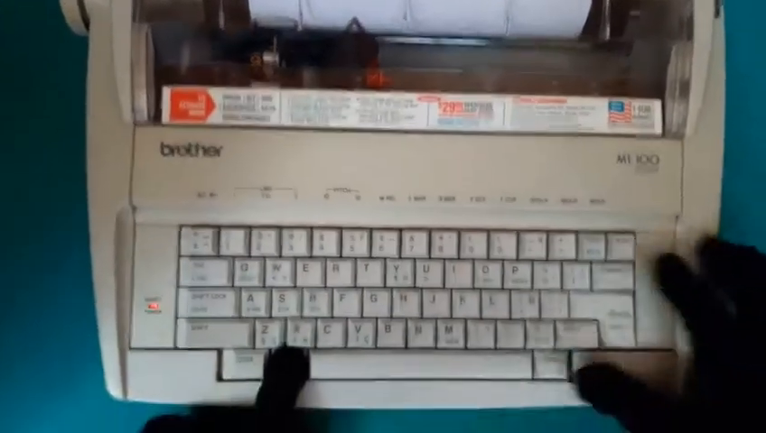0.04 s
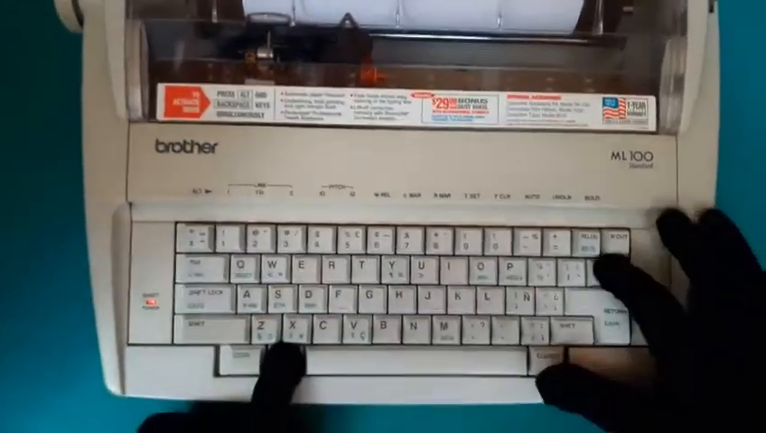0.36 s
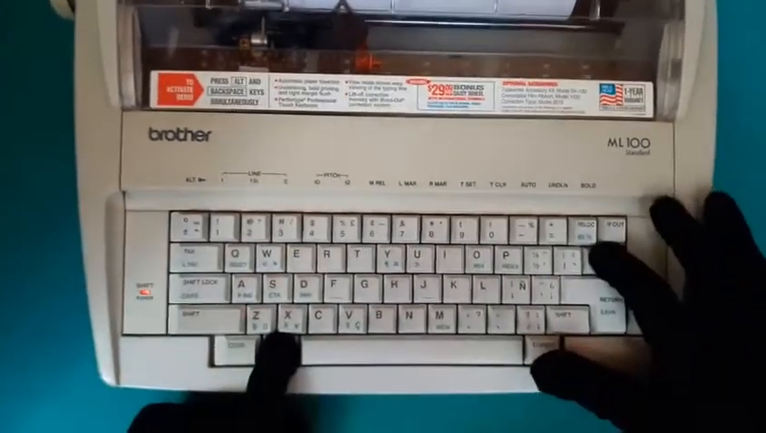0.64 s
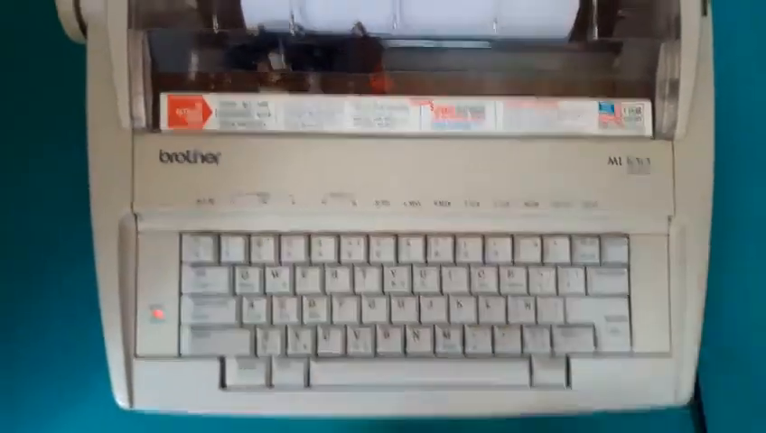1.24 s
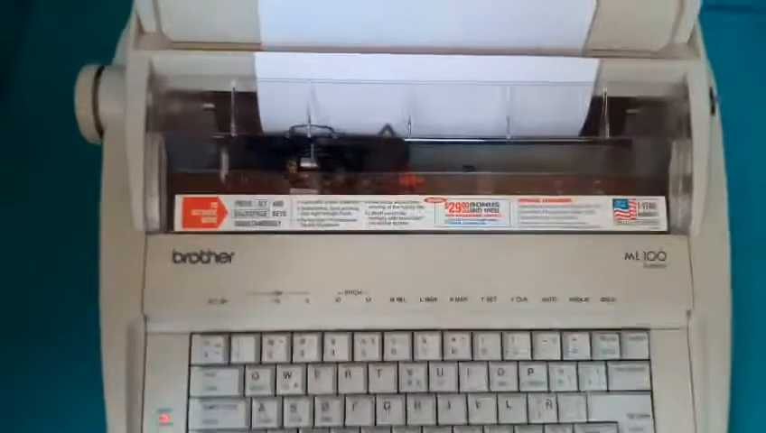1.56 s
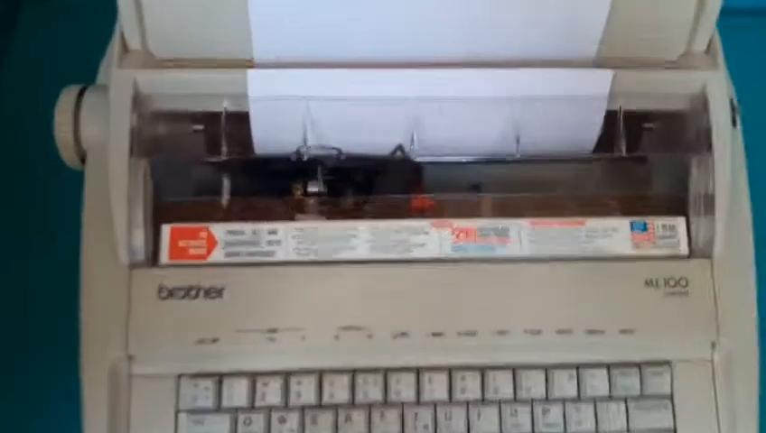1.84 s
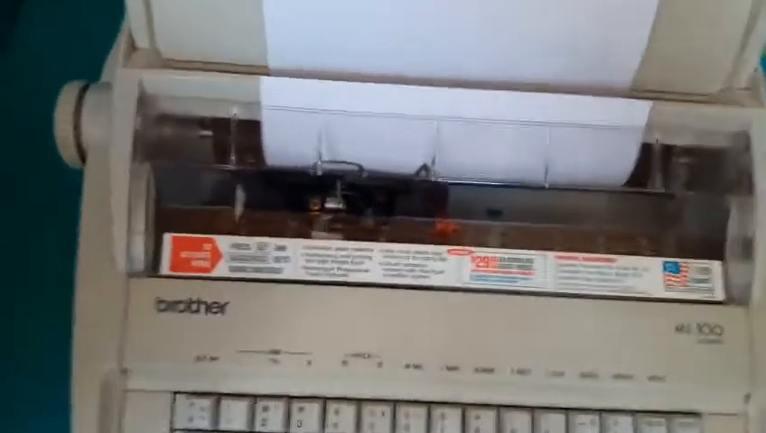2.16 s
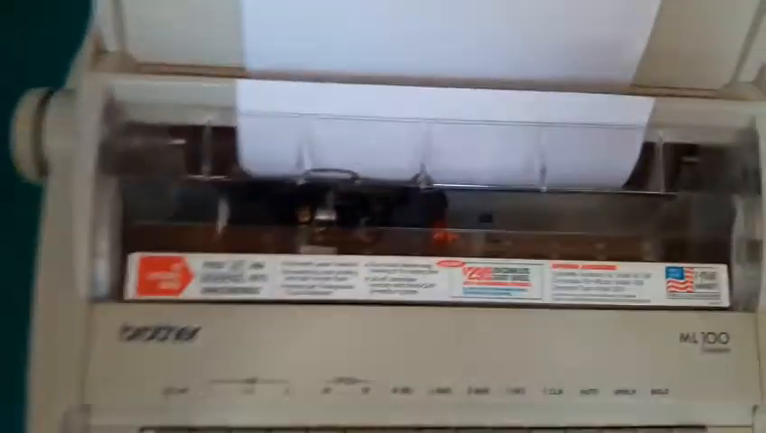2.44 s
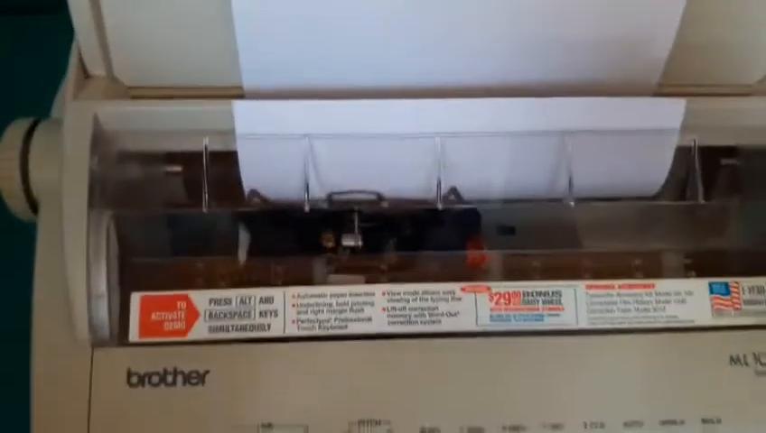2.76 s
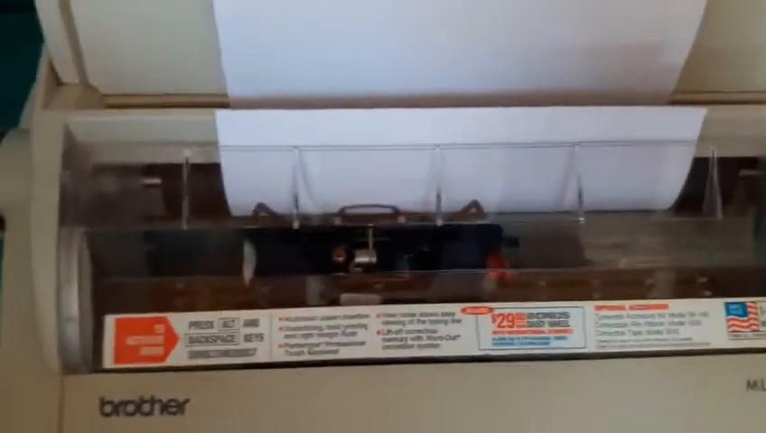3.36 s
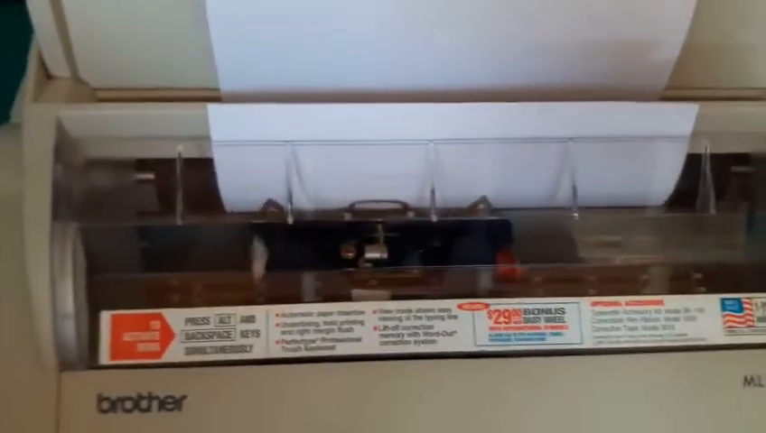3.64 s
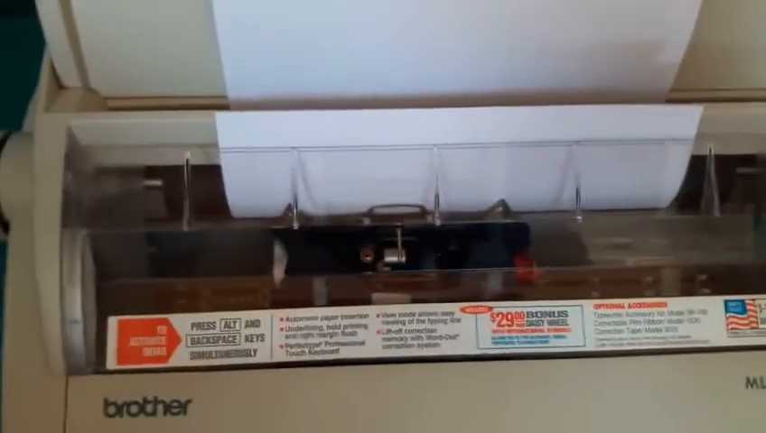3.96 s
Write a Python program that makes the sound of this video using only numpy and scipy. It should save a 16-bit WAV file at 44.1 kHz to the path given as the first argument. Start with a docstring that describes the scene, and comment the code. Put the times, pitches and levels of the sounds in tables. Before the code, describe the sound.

An electric typewriter prints in a small room. A key clicks faintly at about 0.4 seconds, then the motor spins up into a soft, wavering whine. From 0.8 seconds to the end at 4, about two dozen sharp clacks come in quick, uneven runs, each with a light rattle and a soft carriage knock. They turn slightly crisper around 2 seconds as the microphone nears. A low hum lies underneath.

```python
"""In a small room, an electric daisy-wheel typewriter prints a line. A key clicks, then the motor
spins up and whines. For each letter the ribbon mechanism snaps in and rattles, the hammer strikes
and bounces back in the plastic case, and the carriage steps on. The microphone moves from above
the keyboard towards the carriage. A low hum and quiet room noise lie underneath."""
import sys
import numpy as np
from scipy import signal
from scipy.fft import rfft, irfft
from scipy.io import wavfile
from scipy.ndimage import uniform_filter1d

SR = 44100
rng = np.random.default_rng(int(sys.argv[2]) if len(sys.argv) > 2 else 0)


def master(y):
    """Save y as 16-bit WAV."""
    cut = np.clip(np.atleast_2d(y).T, -1, 1)
    pcm = np.round(cut * 32767)  # scale
    wavfile.write(sys.argv[1], SR, pcm.astype(np.int16))


N = 176400
T = np.arange(N) / SR  # seconds since the scene began
AGE = T[:SR // 2]  # seconds since a knock began
FREQS_HZ = np.fft.rfftfreq(len(AGE), 1 / SR)  # the frequencies in one knock

# The printed letters: start_s, level_db, ribbon_offset_db
LETTERS = [(0.796, -4, -10), (1.005, -2.5, -9.5), (1.11, -3, -8), (1.207, -2, -10), (1.333, -2, -10.5),
           (1.492, -3, -7), (1.601, -2.5, -8.5), (1.699, -2, -8), (1.795, -2, -9), (2.018, -4, -6),
           (2.262, -1.5, -10), (2.362, -3, -8.5), (2.475, -1.5, -8), (2.573, -1.5, -9.5), (2.669, -1, -9.5),
           (2.805, -2, -9), (2.911, -1.5, -8.5), (3.168, -3, -9), (3.398, -2.5, -9), (3.497, -1.5, -9.5),
           (3.594, -3, -8.5), (3.75, -2, -8), (3.935, -1.5, -9.5)]


def hammer():
    """The hammer strikes, sets the case ringing and bounces back against a stop: a double thud."""
    # Tone colour of the strike and of the bounce: frequency_hz, gain_db
    strike_colour = [(30,-36),(220,-20.5),(400,-7.5),(900,-1.5),(1600,0),(4000,-3),(5200,-1),(7500,-12.5),(9800,-7),(12500,-17.5),(16000,-30)]
    bounce_colour = [(30,-13),(150,-18.5),(370,1.5),(800,-1),(1500,6.5),(3000,-9.5),(7500,-10.5),(9800,-8),(14000,-25)]
    # Ringing tones of the case and of the stop: pitch_hz, at_keyboard_db, at_carriage_db, fade_s
    case_tones = [(159.3,-42.5,-42,0.29),(258.8,-30.5,-29.5,0.12),(332.2,-42,-32.5,0.19),(478.2,-17.5,-23,0.087),(489,-18,-13,0.014),(606.6,-30,-34,.07),(1939,-23,-12.5,0.041),(2348,-25,-14.5,0.027),(3548,-16,-16.5,0.038)]
    stop_tones = [(625,-11.5,-14,.012),(704,-32,-25.5,0.089),(1501,-21,-18,0.074)]
    case_delay_s, bounce_delay_s = 0.002, 0.0094
    strike_noises, stop_noises = (noise(), noise()), (noise(), noise())
    out = np.zeros(N)
    for start_s, level_db, _ in LETTERS:
        near = nearness(start_s)
        strike = knock(part_noise(strike_noises, near), strike_colour, rise_s=0.0005, fade_s=0.061)
        add(out, start_s, undb(level_db - 7) * closer(strike, near))
        add(out, start_s + case_delay_s, undb(level_db) * ringing_part(case_tones, near))
        bounce = knock(part_noise(stop_noises, near), bounce_colour, rise_s=0.0005, fade_s=0.063)
        stop_ring = ringing_part(stop_tones, near)
        add(out, start_s + bounce_delay_s, undb(level_db) * (undb(-14) * bounce + stop_ring))
    return out


def ribbon():
    """The ribbon mechanism snaps in just before each strike, and its loose parts rattle."""
    # Tone colour of the ribbon mechanism: frequency_hz, gain_db
    ribbon_colour = [(60,-19.5),(150,-36),(300,-8),(1700,0.5),(2400,-4.5),(4000,-7),(5200,-1.5),(7600,-9.5),(10000,-7),(12500,-15),(16000,-24)]
    lead_s = 0.034
    snap_noises = (noise(), noise())
    out = np.zeros(N)
    for strike_s, level_db, ribbon_offset_db in LETTERS:
        snap_s = strike_s - lead_s
        gain = undb(level_db + ribbon_offset_db - 6)
        snap_noise = part_noise(snap_noises, nearness(strike_s))
        add(out, snap_s, gain * knock(snap_noise, ribbon_colour, rise_s=0.0024, fade_s=0.096))
        rattle_s = snap_s + rng.normal(0.018, 0.0032)
        rattle = knock(crackle(), ribbon_colour, rise_s=0.0005, fade_s=0.08)
        add(out, rattle_s, gain * undb(-7.5) * rattle)
    return out


def carriage():
    """The carriage jerks on by one letter with a soft, dull knock."""
    # The carriage's steps: start_s, level_db
    steps = [(0.858,-22.5),(1.059,-27.5),(1.163,-29),(1.274,-30),(1.388,-25),(1.551,-25),(1.656,-26),(1.756,-24),(1.855,-24.5),(2.074,-24),(2.322,-25),(2.422,-24.5),(2.531,-27.5),(2.634,-28.5),(2.727,-25.5),(2.865,-25.5),(2.996,-25),(3.224,-23),(3.454,-23.5),(3.548,-27),(3.651,-25),(3.837,-24.5),(3.99,-26.5)]
    # Tone colour of a step: frequency_hz, gain_db
    step_colour = [(60,-27),(160,1),(1200,1.5),(2000,-6),(2700,4),(3700,-16.5),(5500,-11.5),(15000,-35)]
    out = np.zeros(N)
    for start_s, level_db in steps:
        step = knock(noise(), step_colour, rise_s=0.002, fade_s=0.07)
        add(out, start_s, undb(level_db + 3) * closer(step, nearness(start_s)))
    return out


def keys():
    """A plastic key knocks down, clicks and fades in a soft rustle."""
    # Clicks of a key being pressed or let go: start_s, level_db, brightness_hz
    clicks = [(.358,-37,700),(.391,-34,3500),(0.913,-22.5,2550)]
    # Tone colour of the key: frequency_hz, gain_db
    key_colour = [(150,-18),(600,3.5),(2000,-5),(10000,-18),(15000,-34)]
    out = np.zeros(N)
    add(out, 0.366, ring(pitch_hz=303, level_db=-31.5, fade_s=0.02))  # soft knock of the key bed
    for start_s, level_db, brightness_hz in clicks:
        dulled = [(hz, db - 10 * np.log10(1 + (hz / brightness_hz) ** 2)) for hz, db in key_colour]
        rise_s = 2 / brightness_hz
        click = knock(noise(), dulled, rise_s, fade_s=0.045)
        rustle = knock(noise(), dulled, rise_s, fade_s=0.48)
        add(out, start_s, undb(level_db) * (click + undb(-12) * rustle))
    return out


def motor():
    """The motor spins up and slows a little at each letter; its gears churn and sing wavering tones."""
    # The motor spinning up: time_s, share_of_full_speed
    spin_up = [(.55,.85),(.66,.98),(.8,1)]
    # Tones of the whine: full_speed_pitch_hz, at_keyboard_db, at_carriage_db
    tones = [(479,-57,-47),(912,-47,-47),(985,-45,-49),(1045,-52,-46),(1565,-51,-52),(5330,-63,-65)]
    # Tone colour of the churning gears: frequency_hz, gain_db
    gear_colour = [(80,-15),(170,4.5),(700,0),(950,12),(1200,1),(1600,5),(2200,-8),(5600,-16),(8000,-31),(15000,-47)]
    on_s, rise_s, shaft_hz = 0.545, 0.11, 32
    slow_share, slow_s = 0.012, 0.12  # speed lost at a letter, and for about how long
    waver = 0.008 * np.sin(2 * np.pi * shaft_hz * T) + 0.004 * wander(26)
    speed = np.interp(T, *np.array(spin_up).T) * (1 + waver)
    load = np.max([np.exp(-(2 * (T - start_s) / slow_s) ** 2) for start_s, _, _ in LETTERS], axis=0)
    motor_clock = np.cumsum(speed * (1 - slow_share * load)) / SR  # runs slow when the motor does
    whine = np.zeros(N)
    for pitch_hz, keyboard_db, carriage_db in tones:
        tone = np.sin(2 * np.pi * pitch_hz * motor_clock + wander(shaft_hz) / 2)
        flicker = undb(1.5 * wander(2 * shaft_hz))
        level_db = keyboard_db + nearness(T) * (carriage_db - keyboard_db)
        whine += undb(level_db) * unit(tone * flicker)
    gears = undb(-43) * colour(rng.standard_normal(N), gear_colour)
    return np.clip((T - on_s) / rise_s, 0, 1) * (whine + gears)


def room_echo(sound):
    """The small room's echoes blur into a short tail; the treble dies a little sooner."""
    # Tone colour of the echoes: frequency_hz, gain_db
    echo_colour = [(60,-15.5),(170,4.5),(600,1.5),(10500,-4),(12500,-3.5),(16000,-4.5)]
    spectrum = rfft(noise())
    octaves = np.clip(np.log2(np.maximum(FREQS_HZ, 1) / 1000), -3, 4)  # counted from 1000 Hz
    tail = np.zeros(len(AGE))
    for octave in range(-3, 5):
        band = irfft(spectrum * np.maximum(1 - abs(octaves - octave), 0), len(AGE))
        tail += band * fade(0.36 * 2 ** (-0.034 * octave))
    build_up = 1 - np.exp(-(AGE / 0.0011) ** 2)
    tail = colour(tail * build_up, echo_colour)
    return undb(-11.5) * signal.fftconvolve(sound, tail / np.linalg.norm(tail))[:N]


def drifting_echoes(sound, places):
    """The hand-held microphone drifts through places that each have their own room echo."""
    position = np.linspace(0, places - 1, N)
    shares = (np.maximum(1 - abs(position - place), 0) for place in range(places))
    return sum(room_echo(sound * np.sqrt(share)) for share in shares)


def background():
    """A low hum over quiet room noise."""
    # Tones of the hum: pitch_hz, level_db
    hum_tones = [(118,-60.5),(290,-59)]
    # Tone colour of the room noise: frequency_hz, gain_db
    noise_colour = [(25,-20),(80,-13),(115,-13),(180,-5.5),(290,-13.5),(550,-6.5),(750,-18.5),(1300,-21.5),(3000,-42),(8000,-56)]
    hum = sum(undb(db) * np.sqrt(2) * np.sin(2 * np.pi * hz * T) for hz, db in hum_tones)
    return hum + undb(-52) * colour(rng.standard_normal(N), noise_colour)


def nearness(time_s, leave_s=1.56, arrive_s=2.44):
    """Where the microphone is: 0 over the keyboard, 1 near the carriage."""
    return np.clip((time_s - leave_s) / (arrive_s - leave_s), 0, 1)


def closer(sound, near):
    """Knocks sound crisper as the microphone nears the carriage."""
    # Change of tone colour near the carriage: frequency_hz, gain_db
    near_colour = [(900,0.5),(2200,2.5),(7000,-1)]
    return colour(sound, [(hz, near * db) for hz, db in near_colour])


def part_noise(noises, near, split_hz=1100):
    """A part's lows repeat at every blow, changing as the microphone moves; its treble chatters anew."""
    at_keyboard, at_carriage = noises
    repeated = np.sqrt(1 - near) * at_keyboard + np.sqrt(near) * at_carriage
    low_share = 1 / (1 + (FREQS_HZ / split_hz) ** 2)
    lows = np.sqrt(low_share) * rfft(repeated)
    treble = np.sqrt(1 - low_share) * rfft(crackle())
    return irfft(lows + treble, len(AGE))


def ringing_part(tones, near):
    """A struck part rings briefly, with slightly different pitches and levels at every blow."""
    out = np.zeros(len(AGE))
    for pitch_hz, keyboard_db, carriage_db, fade_s in tones:
        level_db = keyboard_db + near * (carriage_db - keyboard_db)
        out += ring(pitch_hz * rng.normal(1, 0.005), level_db + rng.normal(0, 0.7), fade_s)
    return out


def ring(pitch_hz, level_db, fade_s, rise_cycles=1.5):
    """One ringing tone builds up to its peak level and dies away."""
    shape = (1 - np.exp(-AGE * pitch_hz / rise_cycles)) * fade(fade_s)
    return undb(level_db) * shape / shape.max() * np.sin(2 * np.pi * pitch_hz * AGE)


def knock(texture, tone_colour, rise_s, fade_s):
    """A blow on a part with many close tones: noise that rises quickly and dies away."""
    return colour(texture * (1 - np.exp(-AGE / rise_s)) * fade(fade_s), tone_colour)


def crackle(snap_s=0.0006, spread_db=2):
    """Noise broken into tiny snaps, as loose parts chatter."""
    snap_db = spread_db * noise()[np.arange(len(AGE)) // int(snap_s * SR)]
    return unit(noise() * undb(np.minimum(snap_db, 2 * spread_db)))


def noise():
    """Half a second of white noise, standing for many overlapping tones."""
    return rng.standard_normal(len(AGE))


def fade(fade_s):
    """A fading curve that falls by 60 dB in fade_s seconds."""
    return np.exp(-np.log(1000) * AGE / fade_s)


def wander(rate_hz):
    """A smooth random drift with a typical size of 1."""
    hold = int(SR / rate_hz)
    steps = rng.standard_normal(N)[np.arange(N) // hold]
    return unit(uniform_filter1d(steps, hold))


def colour(sound, points, size=4096):
    """Shape bass and treble along (frequency_hz, gain_db) points; white noise keeps its power."""
    hz, db = np.array(points, float).T
    freqs_hz = np.maximum(np.fft.rfftfreq(size, 1 / SR), 1)
    gains = undb(np.interp(np.log(freqs_hz), np.log(hz), db))
    cepstrum = irfft(np.log(gains))
    # Fold the second half onto the first, so that nothing rings ahead of a blow.
    cepstrum[1:size // 2] *= 2
    cepstrum[size // 2 + 1:] = 0
    response = irfft(np.exp(rfft(cepstrum)))
    return signal.fftconvolve(sound, response / np.linalg.norm(response))[:len(sound)]


def undb(db):
    """Turn decibels into a gain to multiply by."""
    return 10 ** (np.asarray(db) / 20)


def unit(sound):
    """Scale to an average power of 1."""
    return sound / np.sqrt(np.mean(sound ** 2))


def add(out, start_s, sound):
    """Mix a sound in at start_s."""
    first = int(start_s * SR)
    out[first:first + len(sound)] += sound[:max(N - first, 0)]


def scene():
    """The typewriter in the room, the same in both channels."""
    knocks = hammer() + ribbon() + carriage() + keys()
    mono = knocks + drifting_echoes(knocks, places=9) + motor() + background()
    return np.array([mono, mono])


def record(dry, top_hz=16100):
    """Round off the tallest peaks and cut the highest treble."""
    treble_cut = signal.ellip(8, .2, 70, top_hz, fs=SR, output="sos")
    return signal.sosfilt(treble_cut, np.tanh(dry))


dry = scene()
out = record(dry)
master(out)
```